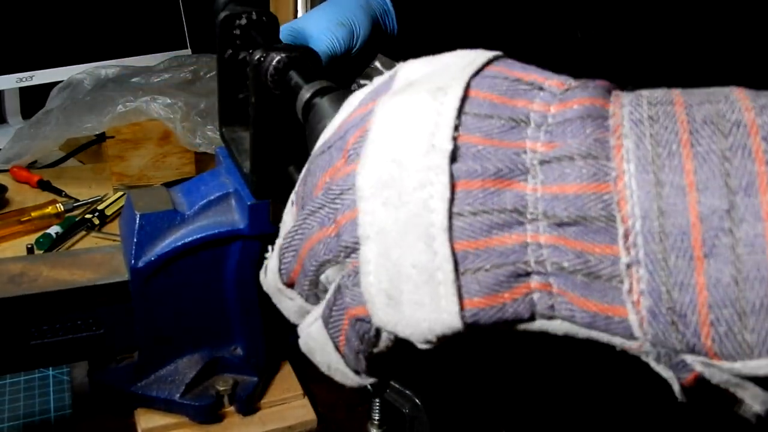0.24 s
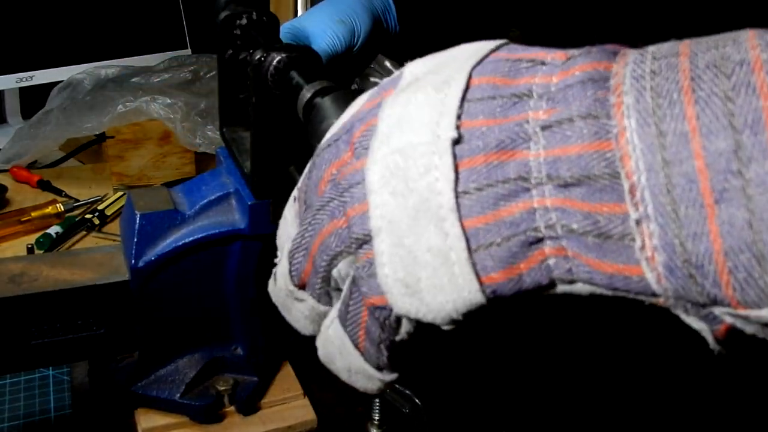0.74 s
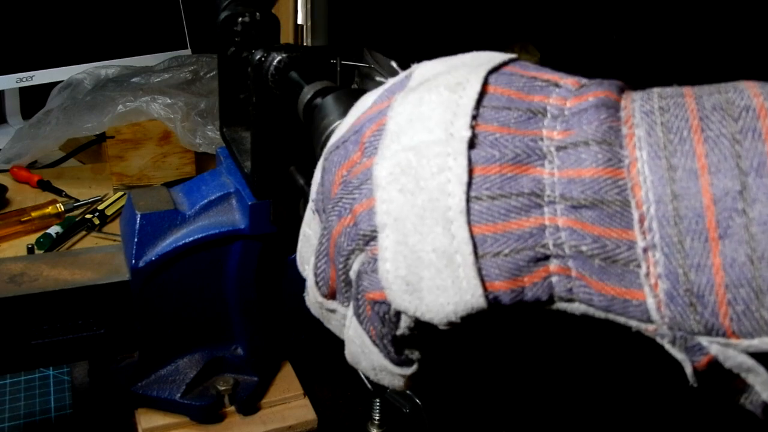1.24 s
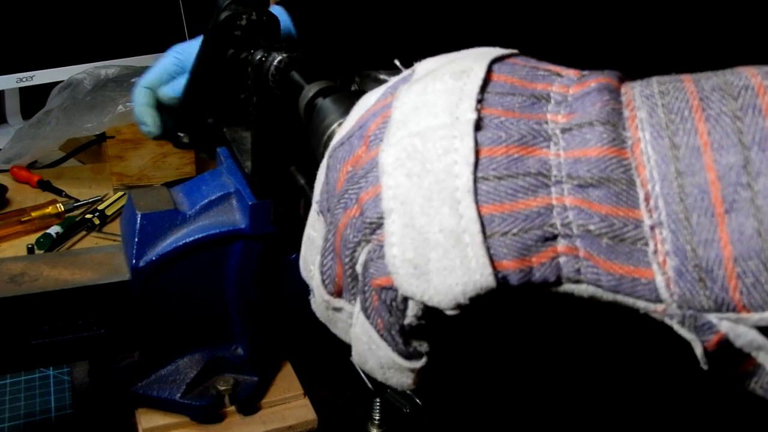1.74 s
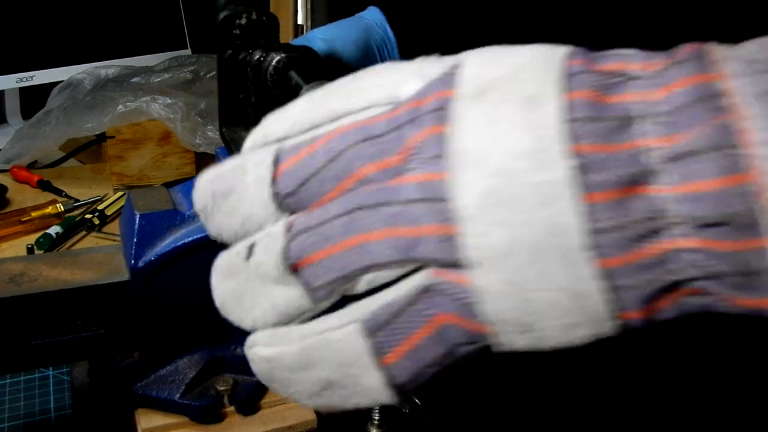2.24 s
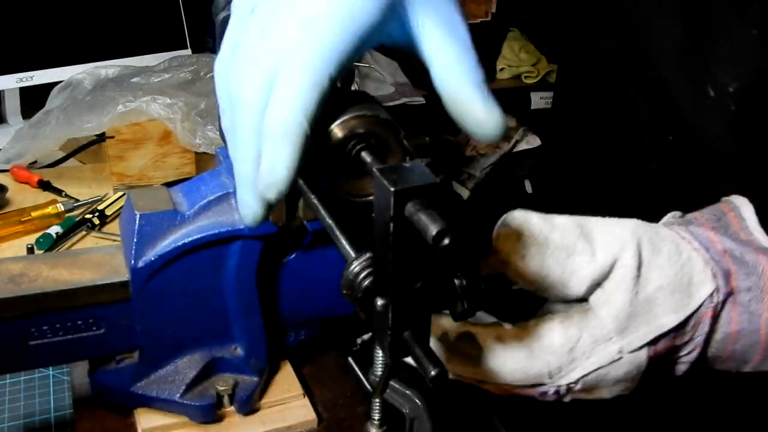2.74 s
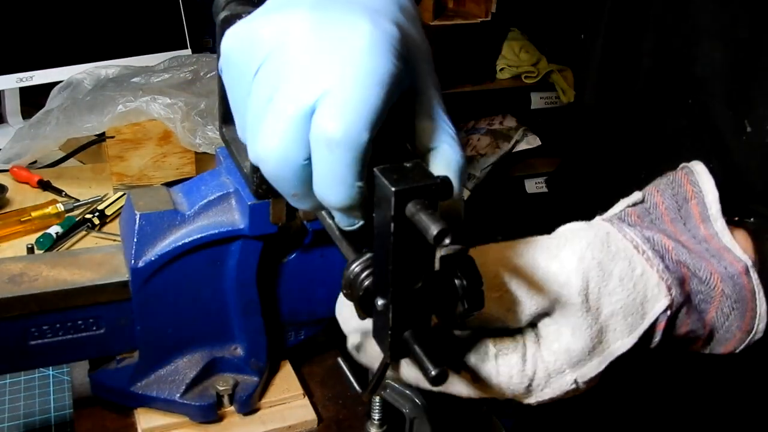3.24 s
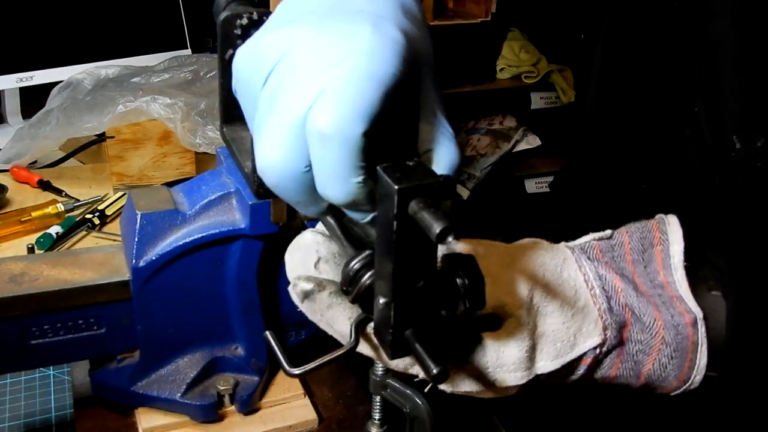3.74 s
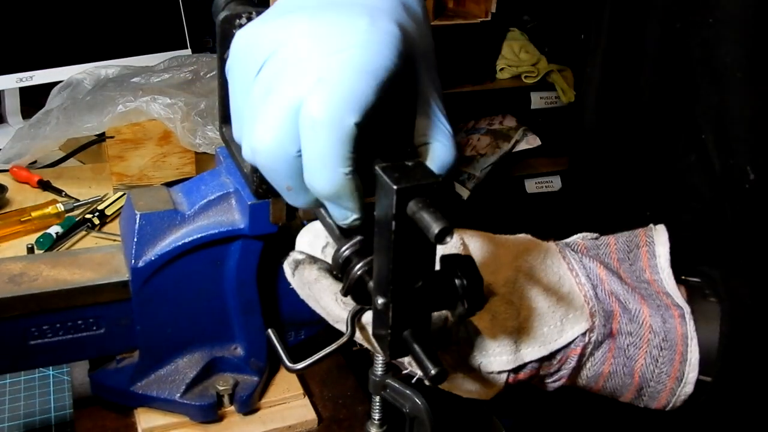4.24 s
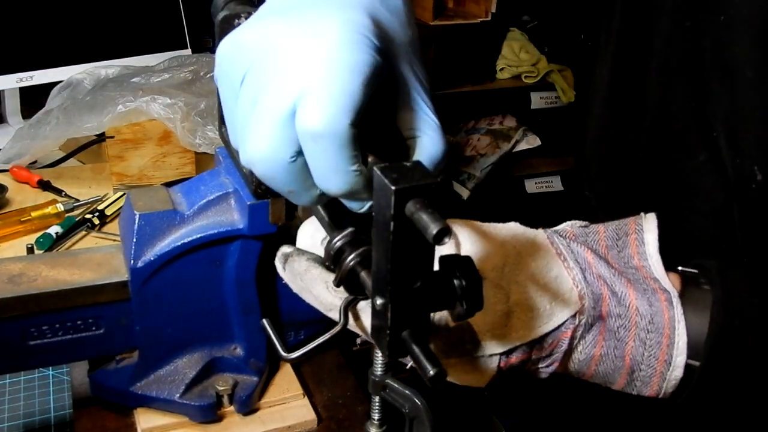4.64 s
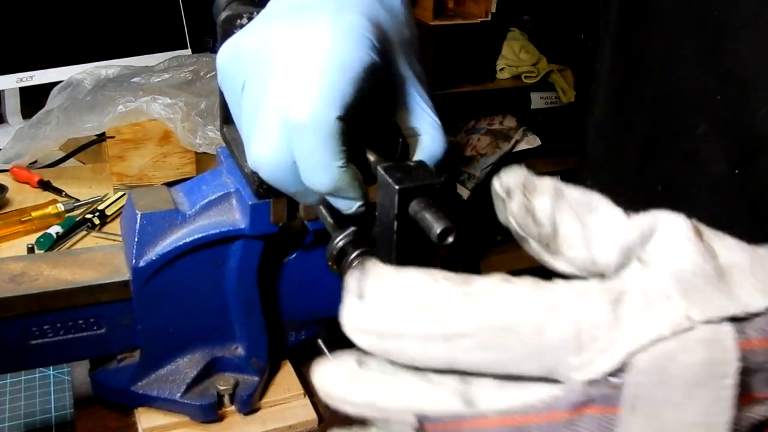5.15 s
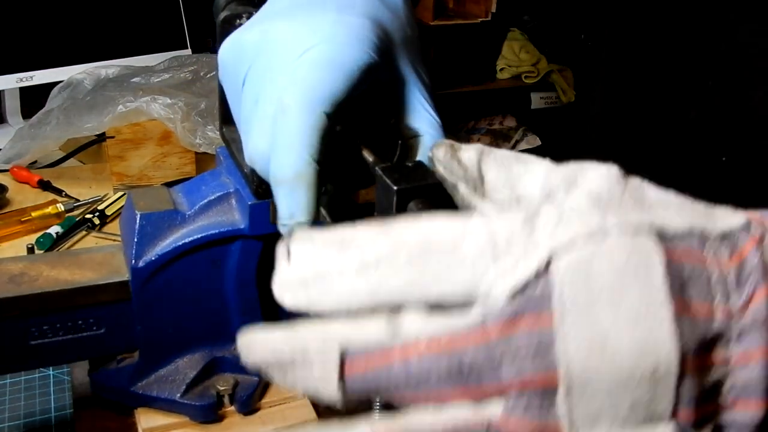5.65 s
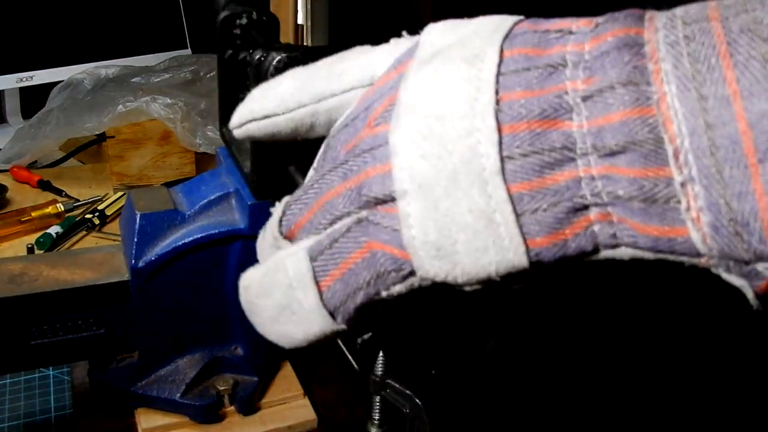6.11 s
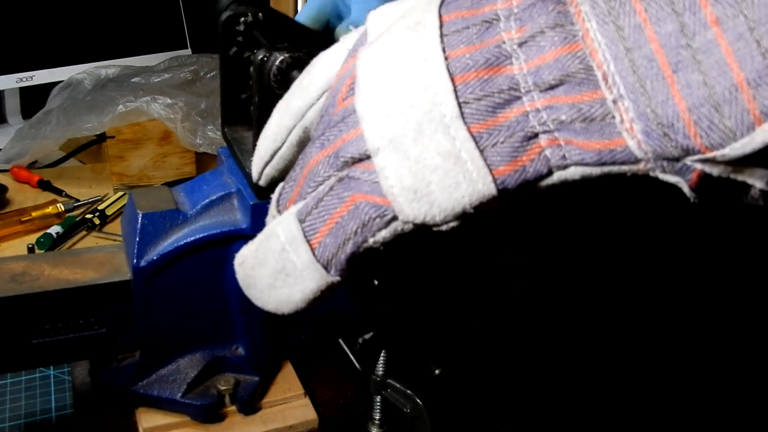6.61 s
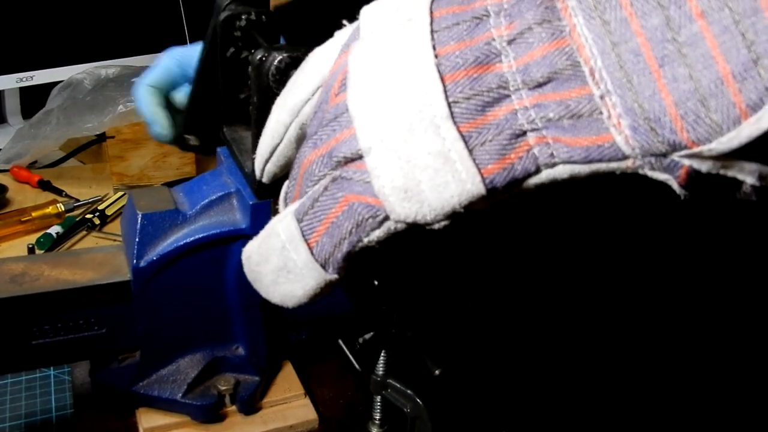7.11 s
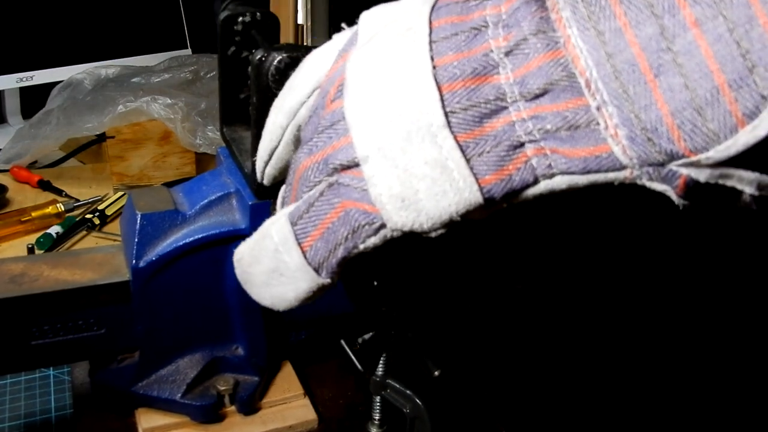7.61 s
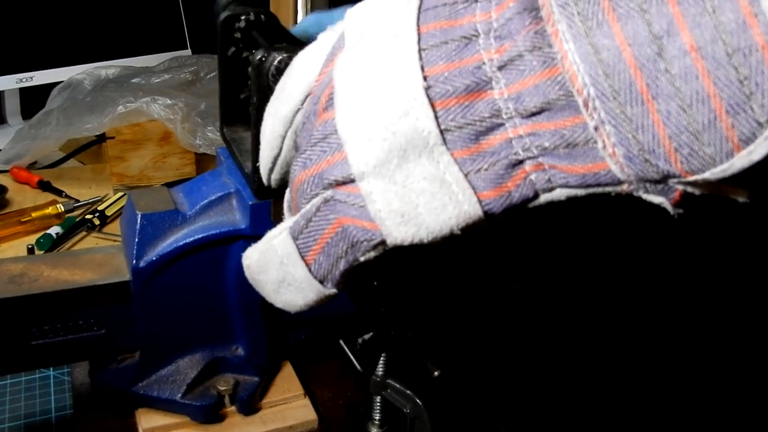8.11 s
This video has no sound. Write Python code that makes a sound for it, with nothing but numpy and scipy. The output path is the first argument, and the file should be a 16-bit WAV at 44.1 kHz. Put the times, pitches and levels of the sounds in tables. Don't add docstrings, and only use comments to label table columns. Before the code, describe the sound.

Close stereo sound of a ratchet on a bench-mounted tool: soft glove rubbing, a run of sharp steel clicks with rattling ring, a clunk, then handling with cloth scuffs, small metal taps and a thin key-like ring. A second run speeds up, slows, hits a very hard stop, and continues with light clicks to a final knock. Low room hum and hiss.

```python
import sys
import numpy as np
from scipy import signal
from scipy.fft import rfft, irfft, next_fast_len
from scipy.io import wavfile
from scipy.ndimage import uniform_filter1d, map_coordinates

SR = 44100
rng = np.random.default_rng(int(sys.argv[2]) if len(sys.argv) > 2 else 0)


def nominal_scale(level):
    x = np.asarray(level, float) / 20
    return 10 ** x


def dump_mix(stems):
    frames = np.atleast_2d(stems).T
    limited = np.clip(frames, -1, 1)
    pcm = np.round(limited * 32767).astype(np.int16)
    wavfile.write(sys.argv[1], SR, pcm)


N = 369116
HIT, SPAN = 6144, 12288
HISS_TOP_HZ = 15500
BRISK_TILT_DB = 2

# t/s, level/dB
CAMERA_GAIN = [(0, -4.5), (7.55, -3.5), (7.6, -21), (8.37, -22)]
# f/Hz, level/dB per Hz
AIR_SPECTRUM = [(12, -54), (20, -13), (38, -16.5), (221, -0.5), (365, -5), (482, -8.5), (603, -9.5),
                (969, -10), (1320, -22.5), (2000, -15), (3130, -20), (4370, -18.5), (10700, -34.5),
                (11600, -34), (15800, -44)]
# f/Hz, level/dB
WHINE = [(11509, -78), (11628, -83.5)]
# f/Hz, likeness/1
AIR_ALIKE = [(60, 0.39), (180, 0.19), (550, 0.22), (1650, 0.63), (4970, 0.43), (15000, 0.087)]
# f/Hz, likeness/1
ROOM_ALIKE = [(200, 0.79), (2000, 0.93), (5000, 0.83), (9000, 0.27), (15000, 0.13)]
# f/Hz, t60/s
ROOM_T60 = [(200, 0.39), (1400, 0.3), (3700, 0.28), (10000, 0.24)]
# f/Hz, left minus right/dB
LEAN = [(60, -10), (180, 2), (550, 1.5), (1650, 1), (4970, 1.65), (8500, 2), (15000, 5.5)]

# f/Hz, width/Hz, level/dB
BENCH_MODES = [(166, 14.6, 2), (219, 32.3, 7), (319, 157, -1.5)]
# f/Hz, width/Hz, level/dB
VISE_MODES = [(400, 62, -1), (485.3, 47, 3.5), (594, 148, -3)]
# f/Hz, level/dB per Hz
LEGS_SPECTRUM = [(30, -22), (60, -13.5), (100, -12), (150, -7.5), (220, -48.5)]
# t/s, force level/dB, vise re bench top/dB, rise/s, t60/s
JOLTS = [(0.67, -48, -9.5, 0.022, 1.7), (1.22, -56.5, 4.5, 0.024, 1.4), (1.51, -55, 4.5, 0.36, 0.51),
         (2.03, -54, -3, 0.32, 0.47), (2.285, -37, -3, 0.0093, 0.41), (2.96, -50, -3, 0.024, 0.45),
         (3.38, -46, -5, 0.11, 1.2), (3.98, -44, -5, 0.0091, 0.86), (4.15, -56, 13.5, 0.15, 0.34),
         (4.5, -44.5, -0.5, 0.064, 0.35), (6.45, -43.5, -6.5, 0.026, 0.36), (6.82, -56, 15, 0.057, 0.5),
         (6.99, -42, 1.5, 0.097, 0.86), (7.41, -45.5, -15, 0.11, 0.51), (7.58, -50, -8, 0.068, 0.27),
         (7.88, -52, -6, 0.11, 0.34), (8.25, -48, -4.5, 0.014, 0.25)]
# t/s, level/dB
WEIGHT = [(0, -55.5), (2.07, -65.5), (2.5, -63), (4.08, -53.5), (5.11, -56), (6.55, -56), (7.11, -59),
          (7.25, -75), (8.37, -72)]
# t/s, level/dB, f/Hz, rise/s, t60/s
GROANS = [(1.33, -50, 205, .02, 0.36), (1.41, -52, 532, 0.022, 0.34), (1.481, -48, 212, 0.018, 0.53),
          (1.56, -53, 312, .03, 1.1), (1.75, -49, 280, .02, 0.4), (1.87, -50, 290, .02, .5),
          (2.001, -46, 224, 0.021, .4), (6.68, -60, 491, 0.063, 0.67), (6.84, -47, 473, 0.062, .35),
          (6.93, -41, 571, 0.018, 0.16), (6.98, -45, 400, .04, 1.2), (6.98, -43.5, 225, .04, 0.99),
          (7.04, -48, 562, .04, 0.52), (7.25, -52, 317, 0.072, .6), (7.36, -47, 332, 0.032, 1),
          (7.42, -48, 230, 0.03, .3), (7.59, -56.5, 218.4, 0.022, 0.68), (7.76, -63, 234, .06, 1.1),
          (7.87, -53, 222, 0.055, 0.31), (7.87, -54.5, 403, 0.061, 0.31)]

# f/Hz, level/dB per Hz
CLOTH_SPECTRUM = [(880, -88), (1500, -11.5), (2640, 5), (2860, 8.5), (3050, 6), (4880, 0), (7000, -12.5),
                  (9100, -16), (15400, -120)]
# f/Hz, level/dB per Hz
FIZZ_SPECTRUM = [(3530, -13.5), (6000, 0.5), (6890, -0.5), (9720, -4.5), (15100, -20), (15800, -77)]
# f/Hz, width/Hz, level/dB
BARREL_MODES = [(1060, 81, 3), (2026, 850, 0.5), (3280, 280, -11), (4340, 500, -41)]
# t/s, level/dB, fizz re body/dB, rise/s, t60/s
STROKES = [(0.01, -58.5, -4.5, 0.02, 7.6), (0.45, -69, -15, 0.2, 0.52), (0.78, -47.5, -14, 0.23, 0.51),
           (1.15, -57, -20, 0.17, 0.89), (2.3, -49, -11, 0.035, 0.49), (2.45, -74.5, 17.5, 0.08, 2.9),
           (2.75, -54.5, -5, 0.2, 2.1), (2.93, -54.5, -6, 0.19, 0.94), (3.15, -68, 1, 0.15, 1.7),
           (3.6, -54, -3, 0.93, 2.2), (4.05, -46, -20, 0.093, 0.29), (5.0, -58.5, -4.5, 0.2, 4.6),
           (5.4, -60, -2, 0.34, 7.3), (5.72, -61.5, 4, 0.15, 1.1), (5.88, -55, 3.5, 0.1, 1.2),
           (6.06, -56, -6.5, 0.08, 1.2), (6.2, -65.5, 1, 0.1, 4), (6.73, -73, 6, 0.082, 0.5)]
# t/s, level/dB
KEY_STRIKES = [(3.27, -53), (3.42, -39), (4.44, -52.5)]

# t/s, peak level/dB, treble re peak/dB, f/Hz
TICKS = [(0.44, -44.5, -8, 2040), (2.245, -28, -16, 3420), (2.2458, -30, -10, 5700), (2.972, -46, 2, 9000),
         (7.527, -20, -12, 5270), (8.2175, -24, -15, 4300), (8.236, -28, -10, 5200),
         (6.476, -40, -30, 2900), (2.265, -31, -33, 3000), (2.274, -21, -20, 4430),
         (2.384, -41.5, -18, 5000), (2.398, -38, -28, 2600), (2.494, -48, 3.5, 2730),
         (3.0177, -39.5, 2.5, 4770), (3.356, -29.5, -14, 4920), (3.408, -27, -25, 3980),
         (3.432, -42, -2, 3000), (3.465, -41, -5, 4470), (3.985, -52, -14, 4500), (4.151, -33.5, -6, 2370),
         (3.6143, -35, -18, 3600), (3.8737, -47, -8, 2040), (4.004, -16, -3, 3850),
         (4.0049, -20, 0.5, 5170), (4.16, -34, -3.5, 2300), (4.5138, -31.5, 0, 4530),
         (5.217, -43.5, -10, 4000), (5.838, -42, -20, 3800), (5.8507, -38.5, -4, 2100),
         (6.09, -45, -11, 3000), (6.135, -53, -10, 4000), (6.165, -55, -2, 4500), (6.392, -47, -10, 2600),
         (5.94, -34, 0, 5150), (6.4483, -27.5, -35, 2900), (6.44, -39.5, -30, 9900)]
# t/s, peak level/dB, treble re peak/dB, f/Hz
TAPS = [(0.189, -44, -12, 2250), (3.097, -41, -22, 3200), (3.1344, -45, -8, 2730),
        (3.2705, -35.5, -10, 2680), (3.3918, -32.5, -11, 4900), (3.966, -30, -7.5, 3600),
        (4.135, -35, -11, 2250), (5.371, -37.5, -32, 1740), (5.664, -37.5, -13, 3260),
        (6.438, -23.5, -30, 2340), (6.682, -42.5, -20, 2320)]
# t/s, peak level/dB, treble re peak/dB, contact t60/s, f/Hz
SCUFFS = [(0.0307, -30.5, -13.5, 0.024, 2940), (0.6668, -33, -15, 0.025, 3820),
          (2.281, -24, -16, 0.0096, 5660), (2.2814, -21.5, -23, 0.01, 2620),
          (2.2878, -25.5, -38, 0.014, 2500), (3.7167, -40, -14, 0.05, 3000),
          (3.238, -45.5, -20, 0.48, 2540), (3.4166, -32, -16, 0.045, 3370), (3.675, -47, -20, 0.071, 3000),
          (3.7234, -36.5, -25, 0.14, 4330), (4.4277, -43.5, -14, 0.33, 3520), (4.847, -46, -26, 0.15, 2400),
          (5.464, -40, -11.5, 0.14, 5100), (6.3785, -47, -21, 0.23, 2550)]
# t/s, peak level/dB, treble re peak/dB, contact t60/s, f/Hz
RUBS = [(0.721, -31, -16, 0.077, 4300), (2.9531, -48, -8, 0.14, 3180), (4.0523, -41, -11, 0.5, 3470),
        (4.4802, -44.5, -10, 0.25, 2800), (5.7077, -48, -6, 0.093, 2700), (5.934, -37, -4, 0.07, 5140),
        (4.882, -33, -20.5, 0.095, 2400), (5.9894, -48, -27, 0.15, 2700), (6.04, -51, -25, 0.13, 2700),
        (5.915, -54, -8, 0.05, 5500)]
# t/s, peak level/dB, t60/s, f/Hz
THUDS = [(0.66, -36, 0.043, 400), (0.72, -33, 0.022, 1000), (2.279, -34, 0.038, 580),
         (3.723, -37.5, 0.038, 1040), (3.967, -40, 0.029, 470), (4.007, -35, 0.031, 500),
         (4.162, -33.5, 0.052, 520), (6.437, -53, 0.12, 470), (7.55, -35.5, 0.013, 563),
         (7.522, -40, 0.04, 640), (8.215, -42, 0.055, 1090), (8.253, -39.5, 0.05, 230),
         (6.01, -50, 0.02, 1040), (6.392, -50, 0.015, 950), (2.28, -29.5, 0.069, 240),
         (8.052, -46.5, 0.074, 610), (8.132, -40, 0.051, 624), (8.249, -52, 0.015, 1060)]

# t/s, peak level/dB, room level/dB, contact/s, treble re peak/dB
STOPS = [
    (7.5512, -3, -14.5, 0.00339, -3.5),
    (8.2523, -9, -10, 0.0039, 1),
]
# f/Hz, width/Hz, level/dB
STOP_MODES = [
    [(2130, 250, -12), (2940, 350, 5), (5330, 410, -7.5), (6340, 300, -11), (7240, 370, -5.5),
     (8590, 320, -8), (11000, 340, -16), (13100, 280, -11)],
    [(3100, 390, -3), (5150, 770, 2), (7320, 620, -6), (8800, 370, 1), (9870, 250, -12), (10200, 280, -7),
     (12000, 490, -4.5), (14800, 390, -17)],
]
# f/Hz, level/dB per Hz
STOP_WASH = [(590, -45), (1000, -18), (1470, -27), (1910, -10.5), (5700, -3), (12500, -8), (16000, -24)]

# f/Hz, width/Hz, level/dB
TOOL_MODES = [(1960, 65, -16.5), (2530, 113, -5.5), (2900, 120, -11), (3430, 205, -6), (4080, 260, 0),
              (4500, 160, -5), (4934, 170, -1.5), (5220, 136, -3), (5700, 270, -6), (6090, 210, -15)]
# f/Hz, level/dB
FRAME_MODES = [(1095, -7.5), (1940, -3.5), (2075, 2), (2535, 3), (2710, -1.5), (2905, -1), (3250, 1.5),
               (3390, 4), (3690, -38), (4155, 2.5), (4910, -20), (5490, 1.5), (5780, 1.5)]
# f/Hz, width/Hz, level/dB
KNOCK_MODES = [(215, 37, 0.5), (293, 80, 0), (416, 42, -4), (514, 60, -3.5), (1087, 42, -5)]
# f/Hz, level/dB per Hz
CHATTER_SPECTRUM = [(410, -30), (700, -30), (1090, -22), (1430, -32.5), (1880, -11), (2480, -1.5),
                    (4040, -3.5), (4520, -13), (5060, 4), (8000, -24), (10400, -56), (17600, -120)]
# f/Hz, level/dB per Hz
CRACK_SPECTRUM = [(3530, -58), (6000, 3.5), (8000, -0.5), (9970, -0.5), (12100, -2.5), (15600, -27),
                  (16500, -51)]
# f/Hz, level/dB per Hz
DROP_WASH = [(440, -63), (750, -19.5), (881, -21), (1020, -18.5), (1120, -13.5), (1400, -25), (1650, -9.5),
             (2020, -5.5), (3040, -8.5), (3280, -5), (4870, 1.5), (6890, -11), (12600, -15), (13900, -38)]
# t/s, peak level/dB, upper f/Hz, lower f/Hz, knock re peak/dB
TURN_1 = [(1.2101, -9, 4160, 2600, -29.5), (1.311, -6, 4960, 2950, -32), (1.3847, -7, 4010, 3400, -37),
          (1.4589, -5, 4920, 3360, -29), (1.5339, -6.5, 5000, 4070, -32.5), (1.6232, -6.5, 4940, 4090, -30),
          (1.726, -6.5, 4910, 3360, -27.5), (1.8537, -9.5, 5200, 3330, -26),
          (1.9794, -9, 5150, 3470, -25.5), (2.0923, -10, 4280, 2510, -26)]
# t/s, peak level/dB, upper f/Hz, lower f/Hz, knock re peak/dB
TURN_2 = [(6.767, -7.5, 4900, 2510, -23), (6.8431, -6, 5210, 2960, -29.5), (6.9215, -5, 3970, 2670, -30),
          (6.986, -4.5, 5150, 3900, -29), (7.0419, -3.5, 5120, 4170, -36), (7.0912, -3.5, 5500, 3580, -32),
          (7.1479, -7, 5820, 3980, -46), (7.222, -10, 5220, 4050, -40), (7.3146, -11, 4150, 2570, -24),
          (7.3612, -30.5, 3860, 2680, -19), (7.4084, -9.5, 5030, 4350, -24.5),
          (7.5188, -8, 5260, 5830, -29.5)]
# t/s, peak level/dB, upper f/Hz, lower f/Hz, knock re peak/dB
TURN_3 = [(7.6093, -27.5, 4120, 3460, -25), (7.6844, -27.5, 4000, 3280, -33),
          (7.7648, -24.5, 5230, 2730, -30), (7.8316, -21.5, 5160, 4200, -29),
          (7.893, -20.5, 4050, 2460, -29), (7.9684, -20, 4120, 2920, -29), (8.0499, -16.5, 4910, 4080, -38),
          (8.13, -19.5, 3820, 2780, -29), (8.2097, -17, 4270, 5850, -23), (8.297, -25, 4560, 2270, -35)]
# crack re peak/dB, chatter t60/s, room level/dB, room loss per dB of sharper peak/dB
TURN_RULES = [
    (-16, 0.032, -7, 0.34),
    (-16.5, 0.033, -7, 0.3342),
    (-15.5, 0.041, -7, -0.12),
]


def rms_one(x):
    return x / np.sqrt(np.mean(x ** 2) + 1e-20)


def peak_one(x):
    return x / np.max(np.abs(x))


def along(points, hz):
    f, v = np.transpose(points)
    return np.interp(np.log(hz + 1), np.log(f + 1), v)


def spectrum_of(points):
    return lambda hz: nominal_scale(along(points, hz))


def over_time(rows):
    s, db = np.transpose(rows)
    return np.interp(np.arange(N) / SR, s, db)


def filtered(x, response):
    m = next_fast_len(x.shape[-1] + HIT // 2)
    return irfft(rfft(x, m) * response(np.fft.rfftfreq(m, 1 / SR)), m)[..., :x.shape[-1]]


def modes(table, scatter_db=0, detune=0):
    extra_db = scatter_db * rng.standard_normal(len(table))
    shift = detune * rng.standard_normal(len(table))

    def response(f):
        total = 0
        for k, (centre_hz, width_hz, db) in enumerate(table):
            c = centre_hz * (1 + shift[k])
            damping = 1j * f * width_hz
            total = total + (-1) ** k * nominal_scale(db + extra_db[k]) * damping / (c ** 2 - f * f + damping)
        return total
    return response


def pair(noise, spectrum, alike):
    def response(hz):
        turn = np.arccos(np.clip(along(alike, hz), -1, 1)) / 2
        return spectrum(hz) * np.array([np.cos(turn), np.sin(turn)])
    mid, side = filtered(noise, response)
    return np.array([mid + side, mid - side])


def burst(t60_s, rise_s, lead_s, channels=1):
    t = np.maximum(np.arange(HIT) / SR - lead_s, 0)
    swell = (1 - np.exp(-t / max(rise_s, 1e-4))) ** 2
    return rng.standard_normal((channels, HIT)) * swell * nominal_scale(-60 * t / max(t60_s, .002))


def lumps(rate_hz, depth_db):
    knots = rng.standard_normal(int(N * rate_hz / SR) + 4)
    return nominal_scale(depth_db * map_coordinates(knots, [np.arange(N) * rate_hz / SR]))


def swells(rows, rest, second_rest):
    t = np.arange(0, N + 64, 64) / SR
    first, second = 0, 0
    for s, db, second_db, rise_s, t60_s in rows:
        shape = nominal_scale(db - 60 * np.where(t < s, (s - t) / (4 * rise_s), (t - s) / t60_s))
        first = first + shape ** 2
        second = second + (shape * nominal_scale(second_db)) ** 2
    fine = lambda power: np.interp(np.arange(N) / SR, t, power)
    return np.sqrt(fine(first) + rest ** 2), np.sqrt(fine(second) + second_rest ** 2)


def new_track():
    return np.zeros((2, N + 3 * SPAN))


def add(track, s, sound):
    start = round(s * SR) + SPAN
    track[:, start:start + SPAN] += sound


def trimmed(track):
    return track[:, SPAN:SPAN + N]


def with_room(hit, lead_s, room_db, colour):
    hz, t, z = signal.stft(rng.standard_normal((2, SPAN)), SR, nperseg=256)
    t = np.maximum(t - lead_s, 0)
    fill = 1 - np.exp(-t / 0.0022)
    decay = nominal_scale(-60 * t / along(ROOM_T60, hz)[:, None])
    tail = signal.istft(z * fill * decay, SR, nperseg=256)[1][:, :SPAN]
    wet = pair(tail, colour, ROOM_ALIKE)
    wet = nominal_scale(room_db) * wet * np.linalg.norm(hit[0]) / np.linalg.norm(wet[0])
    return wet + np.pad(hit, ((0, 0), (0, SPAN - HIT)))


def blurred(hit, size):
    power = uniform_filter1d(np.abs(rfft(hit[0])) ** 2, size=size)
    return lambda f: np.sqrt(np.abs(np.interp(f, np.fft.rfftfreq(HIT, 1 / SR), power))) + 1e-9


def crack(spectrum, t60_s, rise_s, lead_s):
    noise = burst(t60_s, rise_s, lead_s, channels=2)
    return peak_one(pair(noise, spectrum_of(spectrum), [(6000, 0.93), (9000, 0.77), (14000, 0.33)]))


def frame(lead_s):
    waver_s = .007
    t = np.maximum(np.arange(SPAN) / SR - lead_s, 0)
    hz, db = np.transpose(FRAME_MODES)[:, :, None]
    knots = rng.standard_normal((2, len(FRAME_MODES), int(SPAN / SR / waver_s) + 2))
    knots[1] = .9 * np.cumsum(knots[1], axis=1)
    at = np.arange(SPAN) / SR / waver_s
    low, part = at.astype(int), at % 1
    swing, phase = knots[..., low] * (1 - part) + knots[..., low + 1] * part
    level_db = db + 3 * rng.standard_normal(db.shape) + 4 * swing - 60 * t / 0.2
    ring = nominal_scale(level_db) * np.sin(2 * np.pi * hz * t + phase)
    return ring.sum(axis=0) * (1 - np.exp(-t / 0.0047))


def air():
    spectrum = lambda hz: nominal_scale(along(AIR_SPECTRUM, hz)) * (hz < HISS_TOP_HZ)
    out = nominal_scale(-53) * rms_one(pair(rng.standard_normal((2, N)), spectrum, AIR_ALIKE))
    for hz, db in WHINE:
        drift = np.cumsum(rng.standard_normal(N)) * .04
        out += nominal_scale(db + 3) * np.sin(2 * np.pi * hz * np.arange(N) / SR + drift)
    return out


def bench():
    rest_db, rest_follows_weight, vise_rest_db, legs_jolt_db = -62, 0.58, -3.5, -18

    def boom(spectrum, alike):
        force = lumps(rate_hz=35, depth_db=3.0) * rng.standard_normal((2, N))
        return rms_one(pair(force, spectrum, alike))

    def steep(ring):
        return lambda hz: ring(hz) * np.sqrt(np.abs(ring(hz)))

    weight_db = over_time(WEIGHT)
    rest = nominal_scale(rest_db + rest_follows_weight * (weight_db - weight_db.mean()))
    push, twist = swells(JOLTS, rest, rest * nominal_scale(vise_rest_db))
    board = boom(steep(modes(BENCH_MODES)), [(200, 0.99)])
    vise = boom(steep(modes(VISE_MODES)), [(500, 0.96)])
    legs = boom(spectrum_of(LEGS_SPECTRUM), [(40, 0.5), (130, 0.63)])
    legs_gain = nominal_scale(weight_db - 4.0) + nominal_scale(legs_jolt_db) * push
    return nominal_scale(-1.0) * push * board + twist * vise + legs_gain * legs


def groans():
    track, t = new_track(), np.arange(SPAN) / SR - .1
    fade = np.clip((t[-1] - t) / .06, 0, 1) * np.clip((t - t[0]) / .03, 0, 1)
    for s, db, hz, rise_s, t60_s in GROANS:
        knots = rng.standard_normal((2, 16))
        swing, phase = (map_coordinates(row, [(t - t[0]) * 40]) for row in knots)
        envelope_db = -60 * np.where(t < 0, -t / (4 * rise_s), t / t60_s)
        level = nominal_scale(db + 3.5 + 4.7 * swing + envelope_db)
        add(track, s + t[0], fade * level * np.sin(2 * np.pi * hz * t + phase))
    return trimmed(track)


def gloves():
    press, slide = swells(STROKES, nominal_scale(-82), nominal_scale(-85))
    slips = lumps(rate_hz=60, depth_db=2.2) * lumps(rate_hz=9, depth_db=2.2)
    hollow = modes(BARREL_MODES)
    rub = lambda hz: nominal_scale(along(CLOTH_SPECTRUM, hz)) + nominal_scale(7.5) * hollow(hz) ** 2
    hiss = lambda hz: nominal_scale(along(FIZZ_SPECTRUM, hz)) * (hz < HISS_TOP_HZ)
    body = rms_one(pair(slips * rng.standard_normal((2, N)), rub, ROOM_ALIKE))
    fizz = rms_one(pair(slips * rng.standard_normal((2, N)), hiss, ROOM_ALIKE))
    return nominal_scale(over_time(CAMERA_GAIN)) * (nominal_scale(-2.5) * press * body + nominal_scale(-4.5) * slide * fizz)


def hex_key():
    key_hz, t60_s, rise_s = 2930, 0.2, 0.0063
    t, level = np.arange(N) / SR, 0
    for s, db in KEY_STRIKES:
        level = level + nominal_scale(db - 60 * np.maximum(t - s, 0) / t60_s) * np.clip((t - s) / rise_s, 0, 1)
    return level * lumps(rate_hz=70, depth_db=2.0) * np.sin(2 * np.pi * key_hz * t)


def touch(treble_db, rise_s, t60_s, pitch_hz, lead_s, width_hz, barrel_db):
    slips = nominal_scale(4 * np.repeat(rng.standard_normal(HIT // 64), 64))
    loose = modes([(pitch_hz, width_hz, 0)])
    hollow = modes(BARREL_MODES, scatter_db=1.6)
    rub = lambda hz: nominal_scale(along(CLOTH_SPECTRUM, hz)) + nominal_scale(barrel_db) * hollow(hz) ** 2
    part = peak_one(filtered(burst(t60_s, rise_s, lead_s), lambda hz: loose(hz) ** 2))
    body = peak_one(filtered(slips * burst(t60_s, rise_s, lead_s), rub))
    hiss = crack(FIZZ_SPECTRUM, 0.74 * t60_s, rise_s, lead_s)
    return nominal_scale(-9.5) * part + nominal_scale(-4.5) * body + nominal_scale(treble_db + 3.0) * hiss


def thuds():
    track, lead_s = new_track(), .006
    for s, db, t60_s, pitch_hz in THUDS:
        mode = modes([(pitch_hz, 200, 0)])
        hit = peak_one(filtered(burst(t60_s, 0.0038, lead_s), lambda hz: mode(hz) ** 2))
        add(track, s - lead_s, nominal_scale(db - 3.5) * with_room(hit, lead_s, -2.0, blurred(hit, size=12)))
    return trimmed(track)


def scuffs():
    track, lead_s = new_track(), .006
    for rows, rise_s in ((SCUFFS, 0.002), (RUBS, 0.012)):
        for s, db, treble_db, t60_s, pitch_hz in rows:
            hit = touch(treble_db, rise_s, t60_s, pitch_hz, lead_s, width_hz=560, barrel_db=2.0)
            heard = with_room(hit, lead_s, -1.7, blurred(hit, size=50)) + nominal_scale(-30) * frame(lead_s)
            add(track, s - lead_s - 0.7 * rise_s, nominal_scale(db + 2.5) * heard)
    return trimmed(track)


def ticks():
    track, lead_s = new_track(), .006
    for rows, room_db in ((TICKS, -8.5), (TAPS, 0)):
        for s, db, treble_db, pitch_hz in rows:
            t60_s = 0.012 * 2 ** ((db + 40) / 15.5)
            hit = touch(treble_db, 0.00035, t60_s, pitch_hz, lead_s, width_hz=280, barrel_db=-10.5)
            add(track, s - lead_s, nominal_scale(db) * with_room(hit, lead_s, room_db, blurred(hit, size=110)))
    return trimmed(track)


def stops():
    push_low_hz, push_high_hz = 300, 2200
    track, lead_s, t = new_track(), .006, np.arange(HIT) / SR

    def push_band(hz):
        return 1j * hz / (push_low_hz + 1j * hz) / (1 + 1j * hz / push_high_hz) ** 2

    for (s, db, room_db, contact_s, treble_db), table, push_db in zip(STOPS, STOP_MODES, (-25, -21)):
        press = np.sqrt(np.sin(np.pi * np.clip((t - lead_s) / contact_s, 0, 1)) + 1e-9)
        press = press * (t > lead_s) * (t < lead_s + contact_s)
        jam = press * rng.standard_normal((2, HIT))
        parts = modes(table)
        ring = peak_one(filtered(jam[:1], lambda hz: parts(hz) * (1j * hz / (1800 + 1j * hz)) ** 2))
        bright = peak_one(pair(jam, spectrum_of(CRACK_SPECTRUM), [(6000, 0.9), (14000, 0.7)]))
        hit = ring + nominal_scale(treble_db) * bright
        heard = with_room(hit, lead_s, room_db, spectrum_of(STOP_WASH))
        shove = 1. * (np.arange(HIT) == round((lead_s + contact_s / 2) * SR))
        heard[:, :HIT] += nominal_scale(push_db) * peak_one(filtered(shove, push_band))
        add(track, s - lead_s, nominal_scale(db - 2.5) * heard)
    return trimmed(track)


def drops():
    brisk_crack_db = 1
    for turn, (crack_db, t60_s, room_db, lost) in zip((TURN_1, TURN_2, TURN_3), TURN_RULES):
        s, db = np.transpose(turn)[:2]
        pace = np.log2(np.median(np.diff(s)) / np.gradient(s))
        pace[0] = -1
        drop_room_db = room_db - lost * (db - np.median(db))
        for k, row in enumerate(turn):
            yield row, crack_db + brisk_crack_db * pace[k], t60_s, drop_room_db[k], pace[k]


def pawl_hit(upper_hz, lower_hz, crack_db, t60_s, pace, lead_s):
    t = np.arange(HIT) / SR
    scrape = nominal_scale(-26.5 - pace - 60 * np.abs(t - lead_s) / 0.32)
    scrape = scrape * (t < lead_s) * np.minimum(t / 0.015, 1) * rng.standard_normal(HIT)
    force = peak_one(burst(t60_s, 0.00031, lead_s)) + scrape
    steel = modes(TOOL_MODES, scatter_db=2.5, detune=.02)
    tooth = modes([(lower_hz, 200, -1.5), (upper_hz, 220, 3)])
    tilt = lambda hz: nominal_scale(BRISK_TILT_DB * pace * np.log2(np.clip(hz, 1500, 7000) / 3500))
    drive = burst(1.09 * t60_s, 0.0004, lead_s)
    drive[:, round(lead_s * SR) + 8] += nominal_scale(20)
    ring = peak_one(filtered(drive, lambda hz: tilt(hz) * (steel(hz) + tooth(hz))))
    chatter = peak_one(filtered(force, lambda hz: tilt(hz) * nominal_scale(along(CHATTER_SPECTRUM, hz))))
    contact = crack(CRACK_SPECTRUM, 0.013, 0.000096, lead_s)
    return nominal_scale(-5.0) * ring + nominal_scale(-9.5) * chatter + nominal_scale(crack_db + 9.5) * contact


def after_ring(upper_hz, lower_hz, lead_s):
    thin = modes([(lower_hz, 30, -3), (upper_hz, 30, 0)])
    return peak_one(filtered(burst(.3, 0.0023, lead_s), thin))


def bench_knock(lead_s):
    return peak_one(filtered(burst(0.47, 0.0021, lead_s), modes(KNOCK_MODES, scatter_db=4.5, detune=.02)))


def ratchet():
    track, lead_s = new_track(), .02
    fade = np.cos(np.pi / 2 * np.arange(HIT) / (HIT - 1))
    after = np.arange(SPAN) > lead_s * SR + 192
    for (s, db, upper_hz, lower_hz, knock_db), crack_db, t60_s, room_db, pace in drops():
        hit = pawl_hit(upper_hz, lower_hz, crack_db, t60_s, pace, lead_s)
        fine, coarse = blurred(hit, size=20), blurred(hit, size=150)

        def wash(hz):
            kept = 0.34 / (1 + (hz / 6500) ** 6)
            return nominal_scale(along(DROP_WASH, hz)) * (fine(hz) / coarse(hz)) ** kept

        heard = with_room(hit, lead_s, room_db, wash) + nominal_scale(room_db - 30) * frame(lead_s)
        rattle = np.repeat(rng.standard_normal(SPAN // 96), 96)
        heard = heard * nominal_scale(1.8 * rattle * after)
        heard[:, :HIT] += nominal_scale(-25.5) * after_ring(upper_hz, lower_hz, lead_s) * fade
        heard[:, :HIT] += nominal_scale(knock_db - 1.5) * bench_knock(lead_s) * fade ** 2
        add(track, s - lead_s, nominal_scale(db + 1.5) * heard)
    return trimmed(track)


def scene():
    hands = ticks() + scuffs() + thuds()
    tool = ratchet() + stops() + hands + gloves() + hex_key()
    lean = lambda hz: nominal_scale(along(LEAN, hz) * np.array([[.5], [-.5]]))
    return filtered(tool, lean) + bench() + groans() + nominal_scale(over_time(CAMERA_GAIN)) * air()


def top_cut(x):
    return signal.sosfilt(signal.butter(12, 16800, fs=SR, output="sos"), x)


def record(dry):
    mix = filtered(dry, lambda hz: 1 / (1 + (hz / 16250) ** 60))
    return top_cut(mix)


dry = scene()
out = record(dry)
dump_mix(out)
```